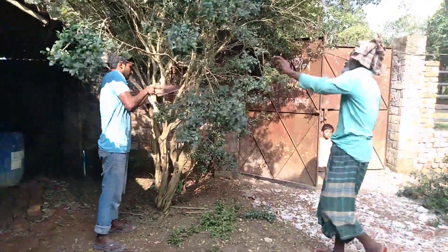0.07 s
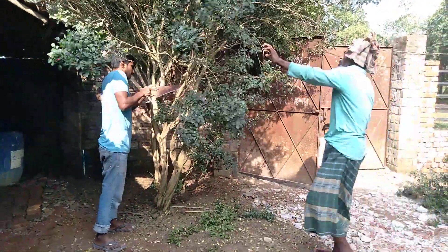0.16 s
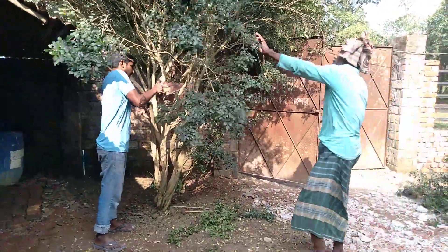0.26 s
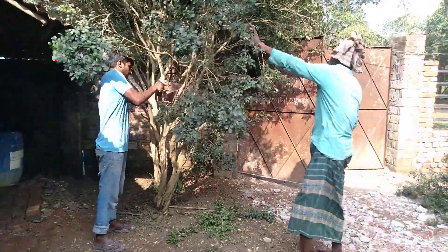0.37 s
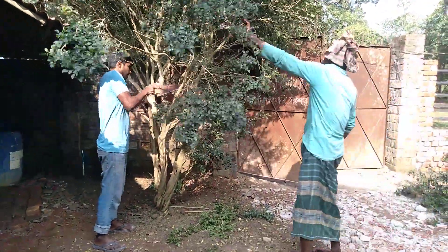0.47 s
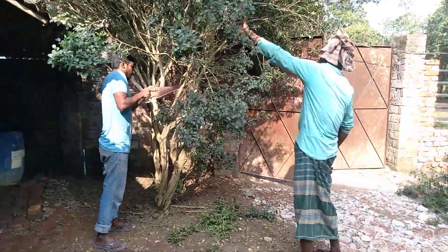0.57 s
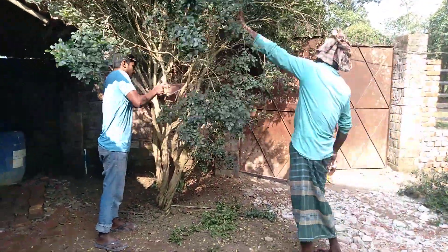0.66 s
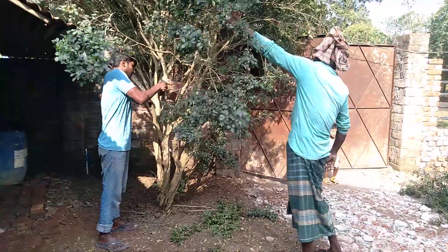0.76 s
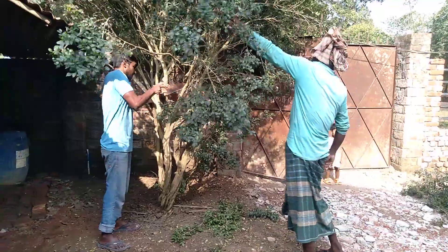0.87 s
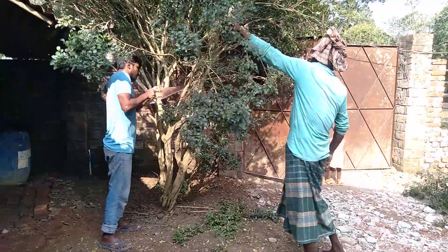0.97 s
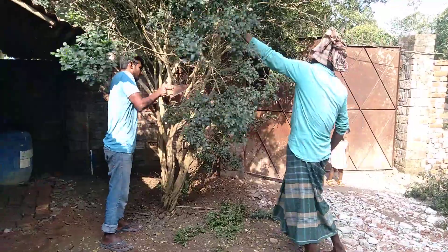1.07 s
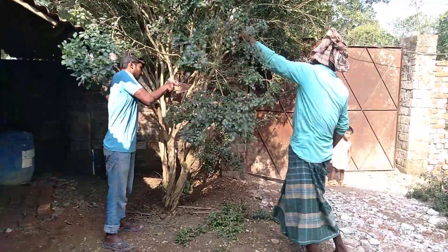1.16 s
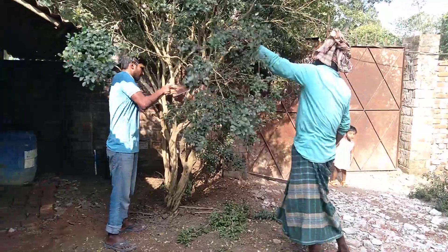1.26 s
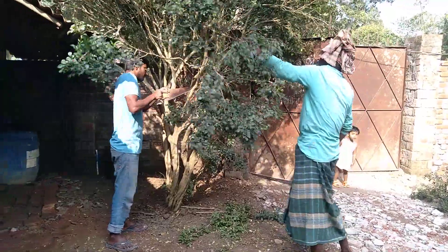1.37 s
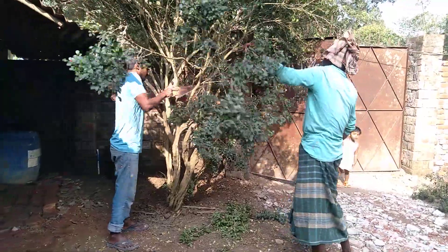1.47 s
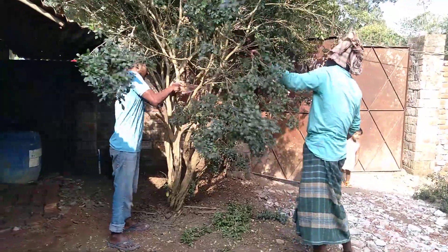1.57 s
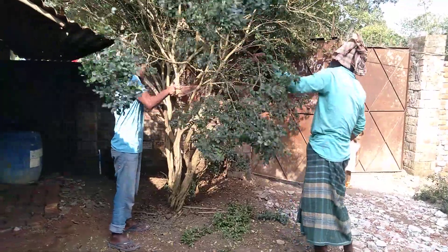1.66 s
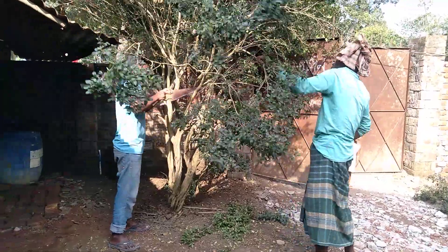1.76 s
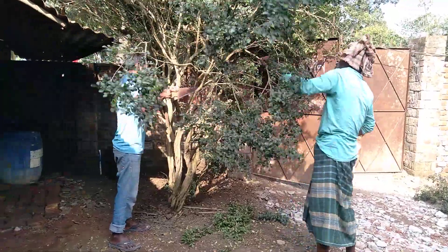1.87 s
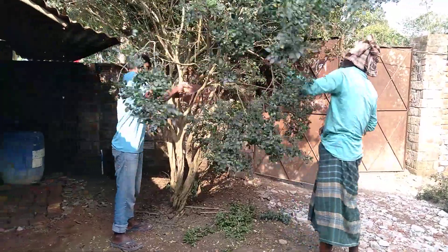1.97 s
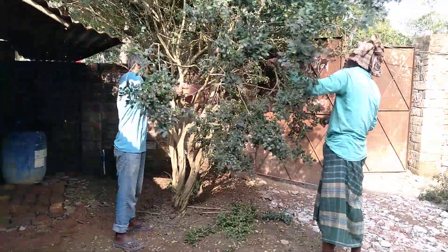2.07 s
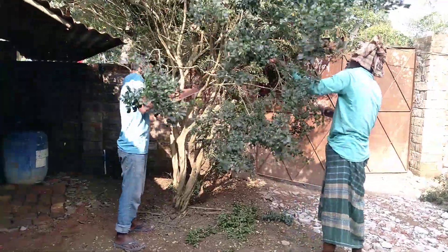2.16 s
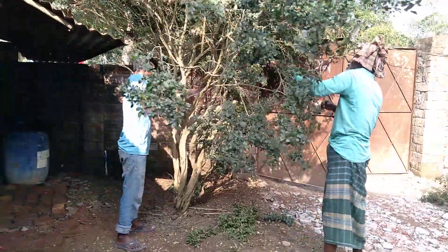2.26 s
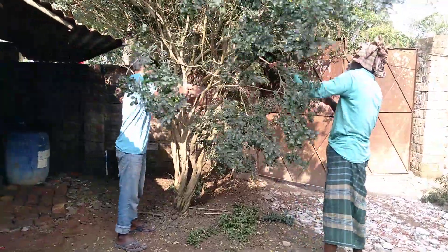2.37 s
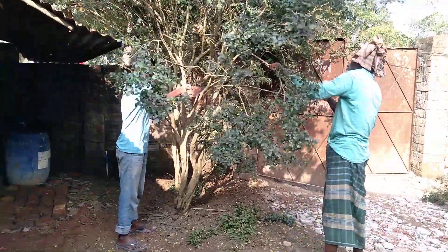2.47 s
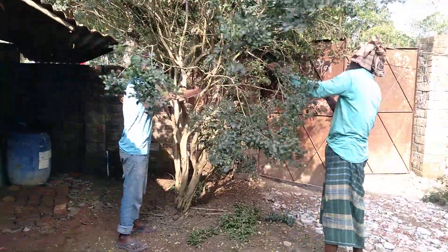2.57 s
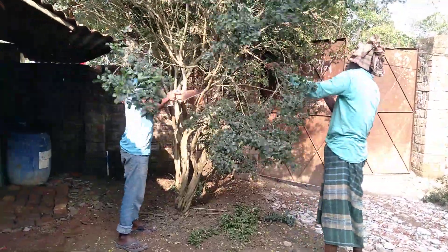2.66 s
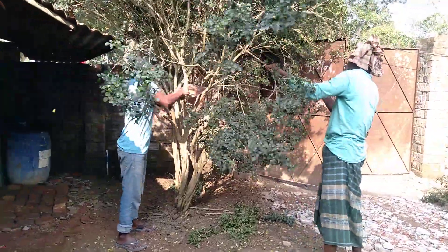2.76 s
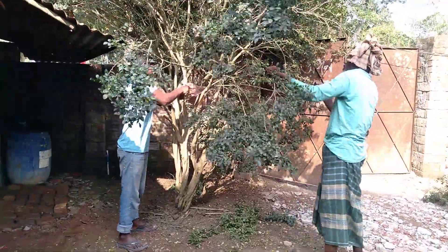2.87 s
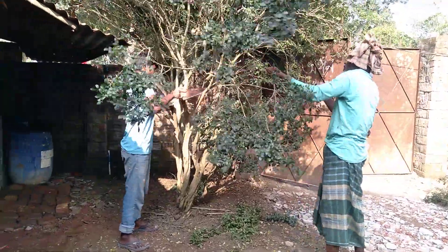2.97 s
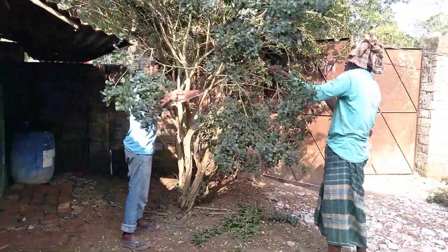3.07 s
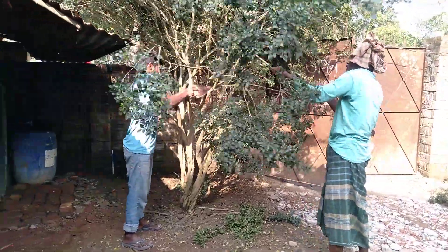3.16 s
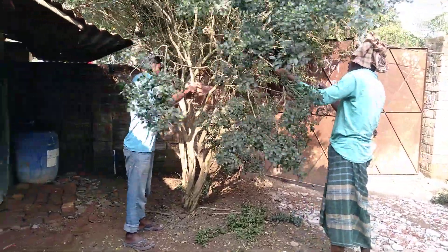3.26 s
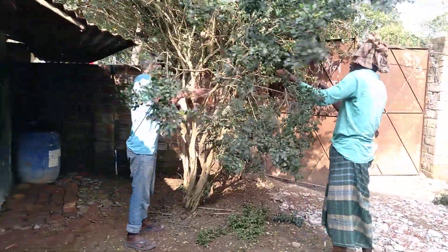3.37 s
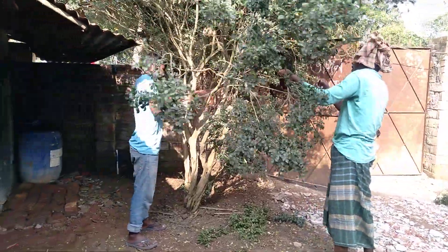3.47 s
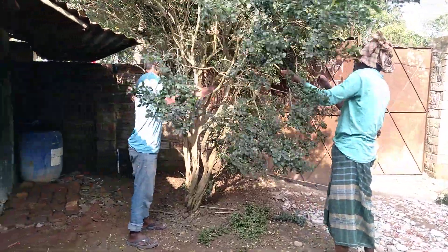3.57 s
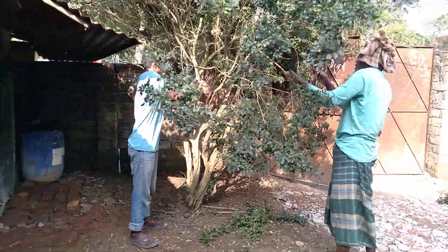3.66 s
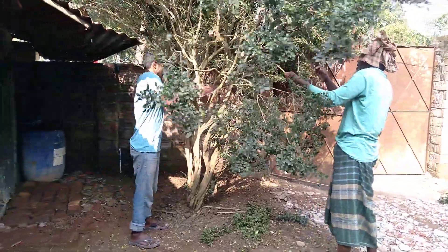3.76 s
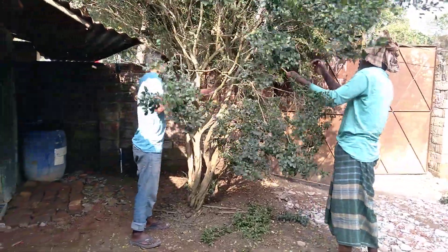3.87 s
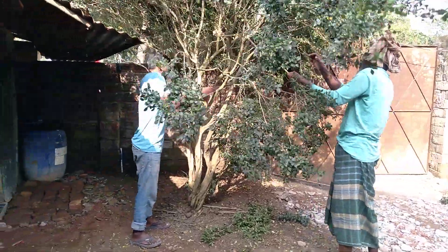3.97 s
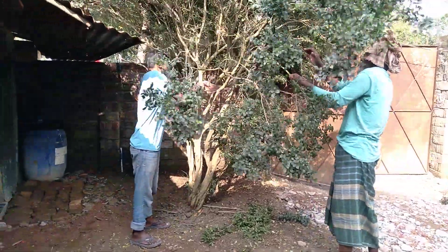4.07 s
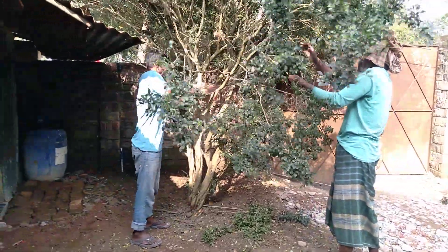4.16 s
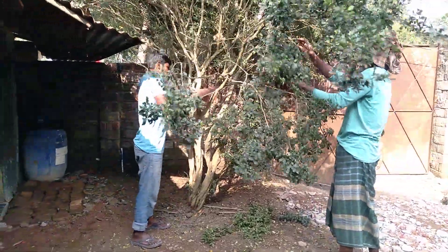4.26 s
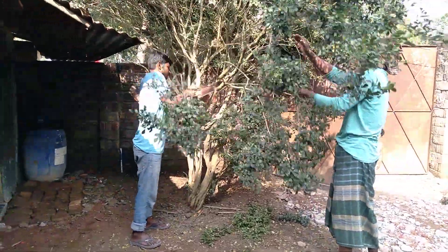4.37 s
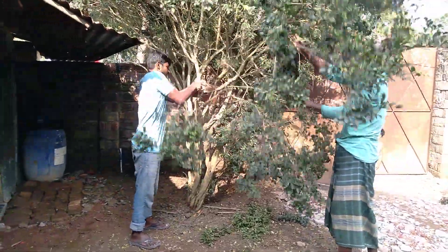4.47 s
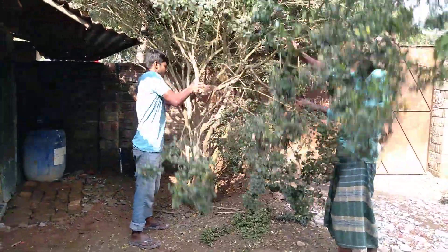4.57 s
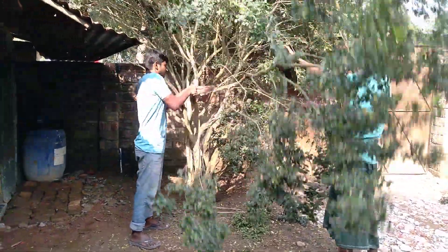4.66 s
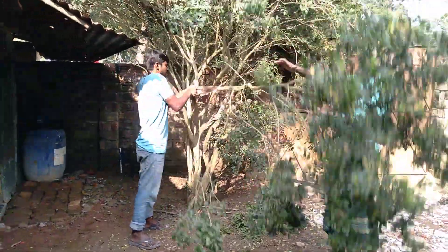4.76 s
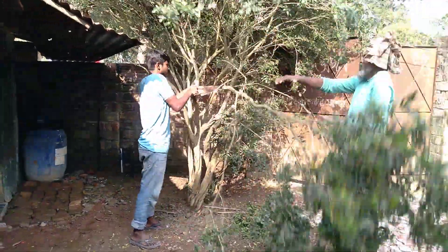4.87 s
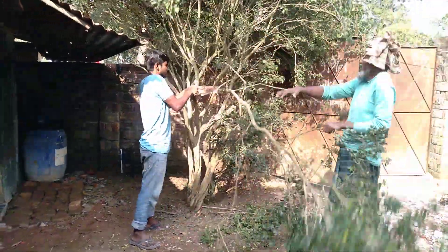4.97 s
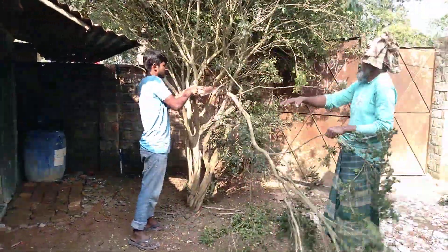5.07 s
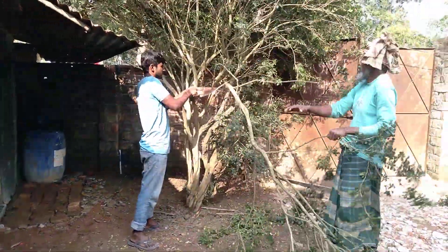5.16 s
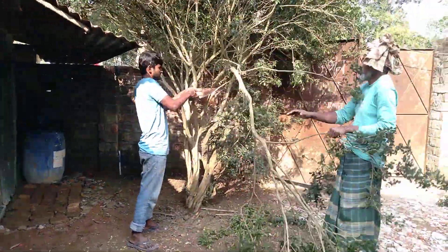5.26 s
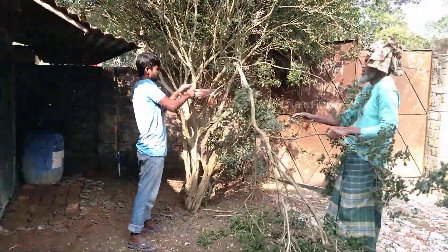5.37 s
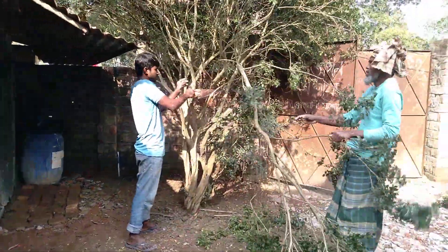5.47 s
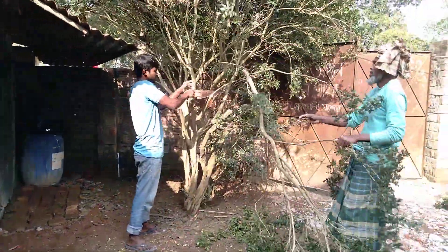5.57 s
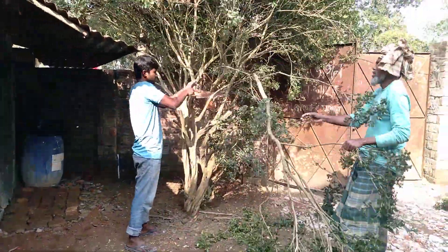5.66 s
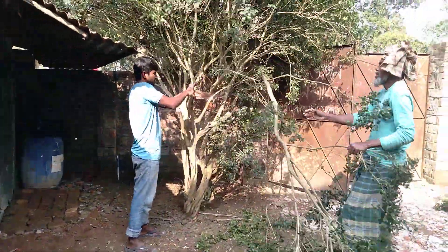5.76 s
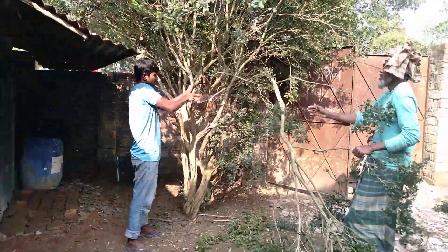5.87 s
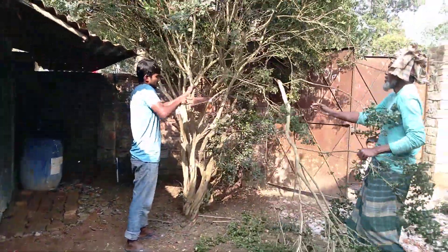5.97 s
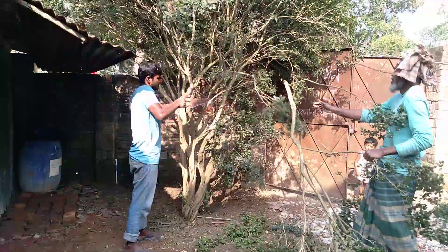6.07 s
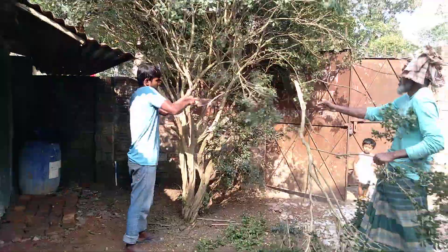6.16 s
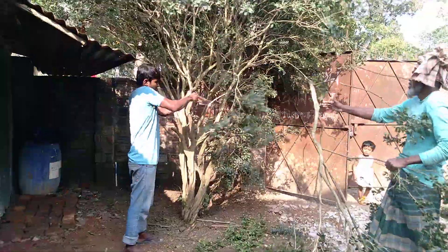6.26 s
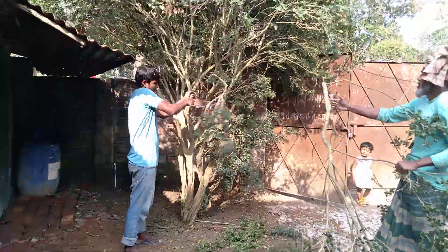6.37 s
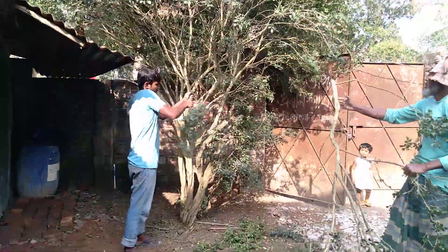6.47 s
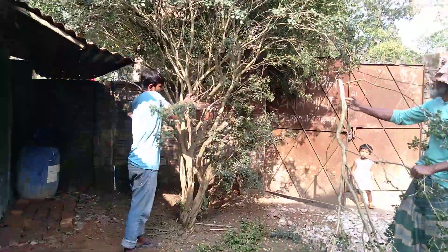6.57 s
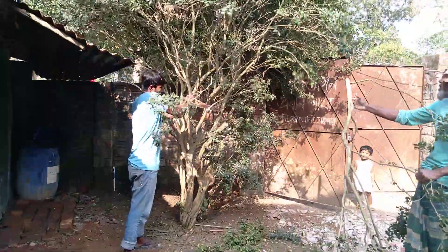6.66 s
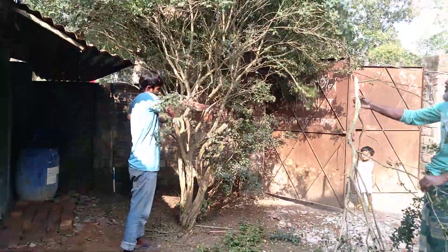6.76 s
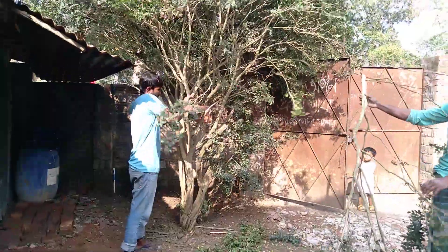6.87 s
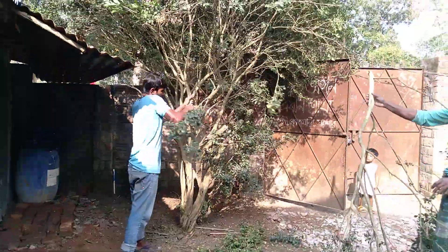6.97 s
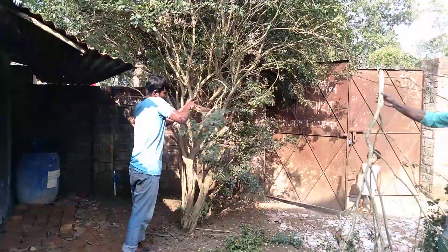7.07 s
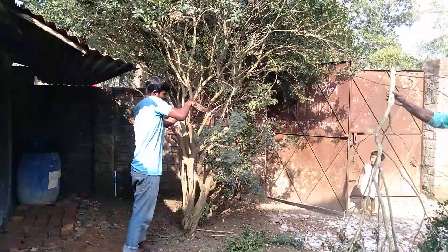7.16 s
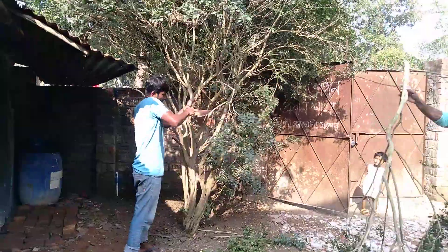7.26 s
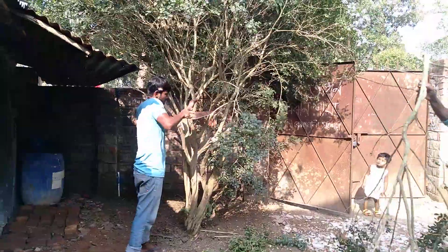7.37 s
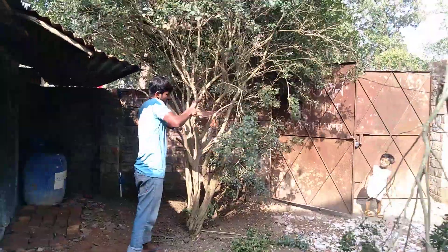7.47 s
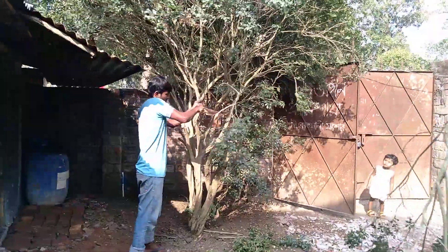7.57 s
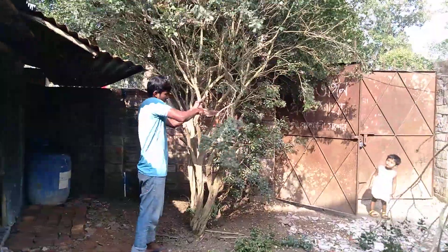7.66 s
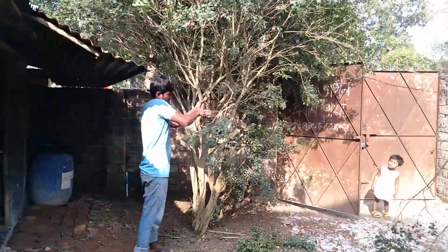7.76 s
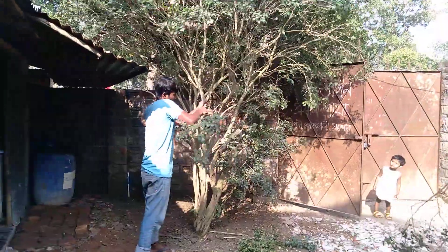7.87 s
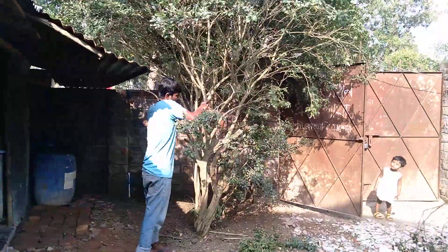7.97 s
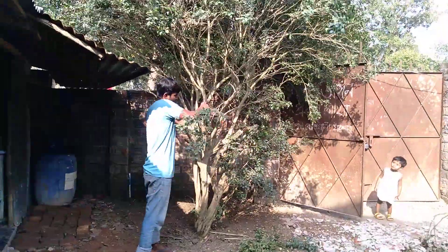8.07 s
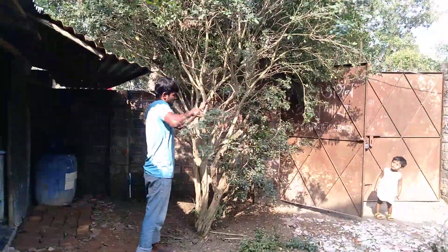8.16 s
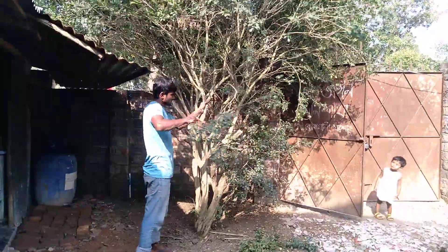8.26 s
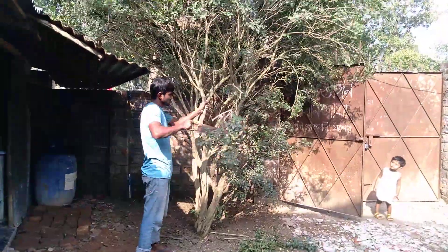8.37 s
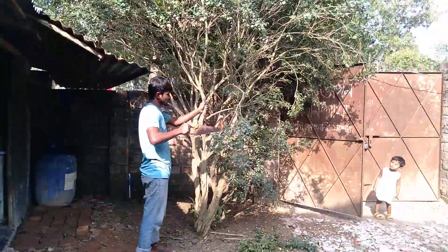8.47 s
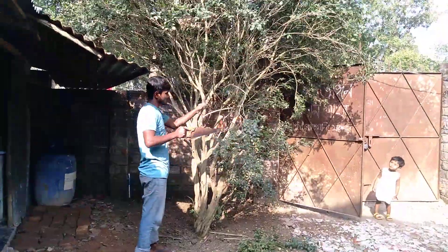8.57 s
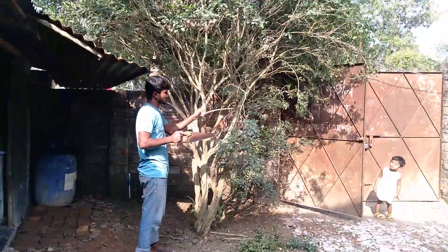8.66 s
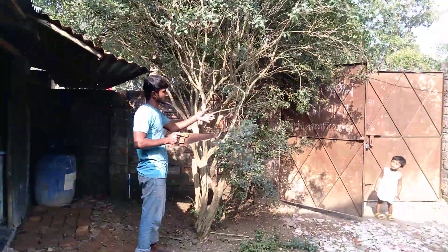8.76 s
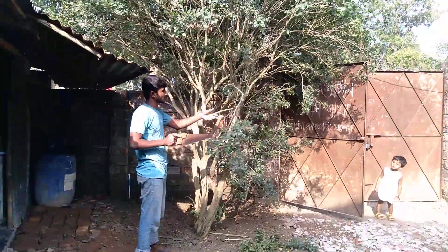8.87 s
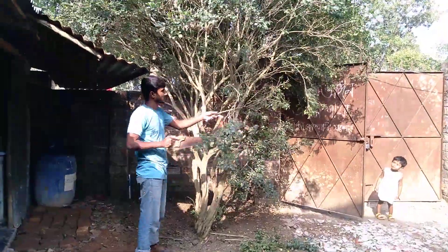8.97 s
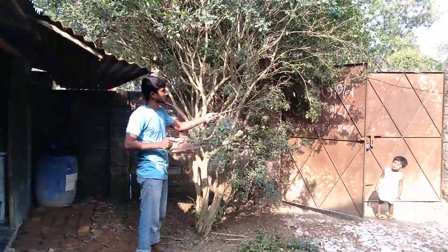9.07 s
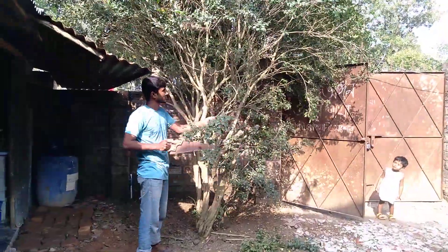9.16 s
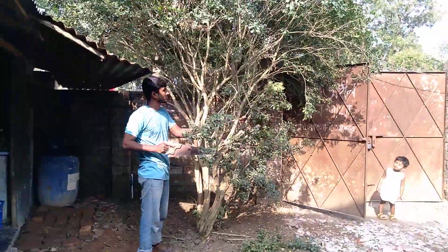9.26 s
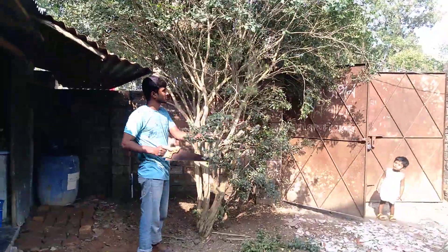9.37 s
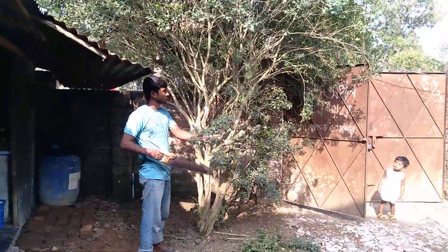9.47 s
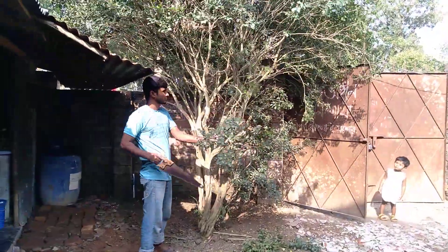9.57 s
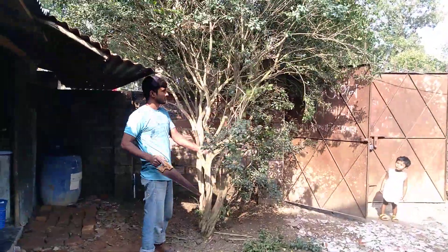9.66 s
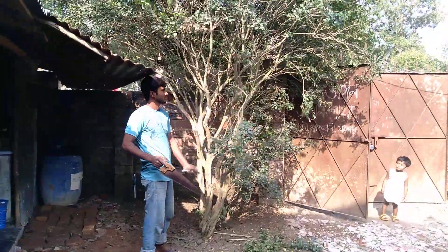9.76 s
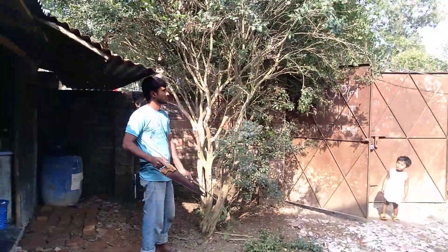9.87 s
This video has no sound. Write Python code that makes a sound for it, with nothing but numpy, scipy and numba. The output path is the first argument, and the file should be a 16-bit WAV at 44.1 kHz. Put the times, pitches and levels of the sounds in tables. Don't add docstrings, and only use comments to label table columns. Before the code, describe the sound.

Steady hand sawing in green wood with ticking leaves, a sharp splintering crack and leafy fall, then sparse catching strokes and knocks in a yard.

```python
import sys
import numpy as np
from scipy import signal
from scipy.fft import rfft, irfft, next_fast_len
from scipy.io import wavfile
from scipy.ndimage import uniform_filter1d, map_coordinates
from numba import njit

SR = 44100
rng = np.random.default_rng(int(sys.argv[2]) if len(sys.argv) > 2 else 0)


def linear_from_db(decibels):
    return 10 ** (np.asarray(decibels, float) / 20)


def unload_wav(signal):
    wavfile.write(
        sys.argv[1],
        SR,
        np.round(np.clip(np.atleast_2d(signal).T, -1, 1) * 32767).astype(np.int16),
    )


N = 437451


def level(x, db):
    return x * linear_from_db(db) / np.sqrt(np.mean(x ** 2))


@njit
def svf(x, hz, width_hz, bend):
    y, band, low = np.empty(len(x)), 0., 0.
    tuned, damping = np.tan(np.pi * hz / SR), width_hz / hz
    for i in range(len(x)):
        g = tuned * bend[i]
        v = (band + g * (x[i] - low)) / (1 + g * (g + damping))
        band = 2 * v - band
        low += 2 * g * v
        y[i] = damping * v
    return y


def steepen(x, hz, width_hz):
    return level(svf(x, 1. * hz, 1. * width_hz, np.ones(len(x))), 0)


def above(x, hz):
    return signal.sosfilt(signal.butter(4, hz, "high", fs=SR, output="sos"), x)


def colour(x, spectrum):
    hz, db = np.transpose(spectrum)
    size = next_fast_len(len(x))
    log_hz = np.log(np.fft.rfftfreq(size, 1 / SR) + 1)
    gain = linear_from_db(np.interp(log_hz, np.log(hz), db))
    return level(irfft(rfft(x, size) * gain, size)[:len(x)], 0)


def read(rows):
    s, *columns = np.transpose(rows)
    return [np.interp(np.arange(N) / SR, s, c) for c in columns]


def walk(rate):
    place = np.arange(0, N + 64, 64) * rate / SR
    coarse = map_coordinates(rng.standard_normal(int(place[-1]) + 2), [place], order=3)
    return np.interp(np.arange(N), 64 * np.arange(len(place)), coarse)


def grains(share, spread_db, smear_s):
    size_db = spread_db * np.minimum(rng.exponential(size=N), 4)
    starts = (rng.random(N) < share) * linear_from_db(size_db)
    return level(signal.lfilter([1], [1, -np.exp(-1 / (smear_s * SR))], starts), 0)


def body(push, modes, drift=0., patchy_db=0.):
    total = 0
    for hz, width_hz, db in modes:
        gain = linear_from_db(db + patchy_db * walk(rate=9))
        bend = np.exp(drift * walk(rate=6))
        total = total + gain * svf(push * rng.standard_normal(N), 1. * hz, 1. * width_hz, bend)
    return level(total, 0)


def swells(s, db, rise_s, fall_s, round_top, floor_db):
    t = np.arange(0, N + 64, 64) / SR
    s, db, rise_s, fall_s = (np.reshape(c, (-1, 1)) for c in (s, db, rise_s, fall_s))
    away = np.where(t < s, (s - t) / np.abs(rise_s), (t - s) / np.abs(fall_s))
    hump_db = db - 10 * np.minimum(away, 20) ** round_top
    power = np.sum(linear_from_db(2 * hump_db), axis=0)
    return 10 * np.log10(np.interp(np.arange(N) / SR, t, power) + linear_from_db(2 * floor_db))


def rings(rows, swell_s):
    out, age = np.zeros(N + 8192), np.arange(8192) / SR / swell_s
    for s, db, hz in rows:
        tone = np.sin(2 * np.pi * hz * swell_s * age)
        out[int(s * SR):][:len(age)] += linear_from_db(db) * age * np.exp(1 - age) * tone
    return out[:N]


def air():
    # hz, db_per_hz
    air_spectrum = [(15, -55), (30, -31), (72, -20.5), (300, -30), (570, -35), (1300, -36), (2500, -34),
                    (3800, -33), (4500, -11), (8100, 1.5), (11300, -8), (15200, -2.5), (16500, -25)]
    return linear_from_db(-40.0 + 0.28 * walk(rate=4.8)) * colour(rng.standard_normal(N), air_spectrum)


def leaves():
    # time_s, leaf_level_db, bough_weight_db
    shaking = [(0, -40.5, 3.5), (1.2, -41.5, -4.5), (1.9, -39.5, 1.5), (4.25, -43, 4.5), (4.45, -30, 17),
               (4.7, -32.5, 1), (4.95, -36, -3), (5.15, -26.5, 8), (5.45, -31.5, 2.5), (5.75, -40.5, -9.5),
               (6.5, -40.5, -9.5), (7.9, -40, -26), (8.73, -37.5, -36), (8.93, -58.5, -4),
               (9.24, -61.5, -4), (9.36, -42.5, -9.5), (9.7, -34.5, -6), (9.92, -42, 17)]
    # peak_s, level_db, rise_10db_s, fall_10db_s, weight_db
    brushes = [(1.535, -29.5, -0.1147, 0.23, -1), (5.0, -33, 0.3958, 0.28, -2),
               (5.08, -27.5, 0.1941, 0.1973, 6.5), (5.191, -16.5, 0.1138, 0, -2.5),
               (5.8, -43.5, -1, -0.5, -26.5), (5.93, -48.5, 0.16, -1, 2.5), (6.12, -41, -7.18, 0.22, -21),
               (6.21, -33, 0.13, 0.14, 16), (6.45, -41, -0.25, 1.05, -19),
               (7.14, -31.5, -0.06, 0.084, -9.5), (7.32, -33.5, 0.03, 0.3, -10.5),
               (7.57, -31.5, -0.0269, 0.039, 16.5), (7.97, -41.5, -1.28, 0.24, -26),
               (8.179, -28.5, 0.0123, 0.1189, 13.5), (8.32, -40, 0.0154, 0.1238, 11.5),
               (8.765, -43, 0.02, 0.1123, 12.5), (9.38, -34, 0.142, 0.13, -18),
               (9.52, -38.5, 0.09, -0.1, -4.5), (9.18, -47, -0.07, .03, -15),
               (9.24, -54.5, -0.15, 2.74, -7.5), (9.791, -21.5, 0.094, 0.01, -1),
               (9.85, -38.5, 0.094, -3.28, 5)]
    # hz, db_per_hz
    leaf_spectrum = [(2350, -41), (4000, -10.5), (6200, -2.5), (7540, 1.5), (11600, -7), (15200, -4),
                     (16200, -7.5), (16500, -48)]
    twig_spectrum = [(1250, -45.5), (1750, -10.5), (2090, -4.5), (2280, -0.5), (3910, -1), (5000, -9.5),
                     (6500, -26.5), (11000, -120)]
    bough_spectrum = [(110, -35), (200, -12), (480, -12.5), (660, -1), (901, 2.5), (1600, -7), (2080, -24),
                      (3520, -120)]
    stem_spectrum = [(1050, -44.5), (1380, -6), (1550, -3), (1900, -2), (2500, -20)]
    steady_db, weight_db = read(shaking)
    s, db, rise_s, fall_s, pull_db = np.transpose(brushes)

    def shake(share):
        settle_s = fall_s * (1 - 0.364 * share)
        return swells(s, db + share * pull_db, rise_s, settle_s, 0.928, steady_db + share * weight_db)

    leaf_db = shake(0)
    twig_db = -10 + shake(0.1293) - leaf_db
    bough_db = -23.5 + shake(1) - leaf_db
    stem_db = -15 + shake(0.486) - leaf_db
    twig_db = twig_db - 0.362 * np.maximum(leaf_db + 35.5, 0)
    rattle = linear_from_db(-13.5) * grains(0.0039, 5.2, 0.0016)
    leaf = colour(rng.standard_normal(N) * (linear_from_db(1.72 * walk(rate=31)) + rattle), leaf_spectrum)
    twig = colour(rng.standard_normal(N) * (linear_from_db(1.09 * walk(rate=18)) + rattle), twig_spectrum)
    bough = colour(rng.standard_normal(N) * linear_from_db(1.78 * walk(rate=15)), bough_spectrum)
    stem = linear_from_db(stem_db + 2.0 * walk(rate=20)) * colour(rng.standard_normal(N), stem_spectrum)
    return linear_from_db(leaf_db - 1.0) * (leaf + stem + linear_from_db(twig_db) * twig + linear_from_db(bough_db) * bough)


def strokes(lag_s, sharp, stretch, column):
    # time_s, blade_db, wood_rel_db, branch_thud_rel_db
    pushes = [(.33, -33, -3, -12.5), (.735, -32.5, -2.5, -14.5), (1.55, -32.5, -1.5, -12),
              (1.99, -30, -4.5, -8.5), (2.4, -29, -4.5, -17), (2.805, -29.5, -5, -15.5),
              (3.225, -29, -5.5, -10.5), (3.645, -29.5, -5, -13.5), (4.06, -28, -7, -14.5),
              (6.21, -30.5, -1.5, -11.5), (8.178, -35.5, -5, -7.5)]
    # time_s, blade_db, wood_rel_db, branch_thud_rel_db
    pulls = [(.14, -41, -3.5, -19.5), (.55, -41, -0.5, -10.5), (.95, -41, -2.5, -12.5),
             (1.14, -35.5, -5, -19.5), (1.385, -37.5, -4.5, -20.5), (1.8, -40, 0, -24),
             (2.19, -38, -4.5, -12.5), (2.62, -39, -4, -18), (3.03, -39, -3, -10.5), (3.46, -36.5, -4, -15),
             (3.87, -37.5, -6, -13), (4.23, -42, -6, -16), (6.07, -42.5, 0, -11), (7.4, -44, 0.5, -10),
             (7.57, -40, -2.5, -7.5)]
    # time_s, blade_db, wood_rel_db, branch_thud_rel_db
    catches = [
        (5.95, -40, -5.5, -11.5),
        (6.87, -42.5, -31, -20.5),
        (6.95, -47, -3.5, -13.5),
        (7.315, -32, -8, -12),
        (8.15, -32, -10.5, -32),
        (8.32, -38.5, -1.5, -12.5),
        (8.77, -55.5, 0, -7.5),
    ]
    # rise_10db_s, fall_10db_s, roundness of the top, share of the lag
    push_shape, pull_shape = (.045, .042, 1.4, 0.89), (0.1096, 0.094, 3, 0.1054)
    catch_shape = (.006, .055, 1.2, 0.303)
    db = -95
    for rows, shape in ((pushes, push_shape), (pulls, pull_shape), (catches, catch_shape)):
        rise_s, fall_s, round_top, late = shape
        c = np.transpose(rows)
        peak_db = c[1] + (c[column] if column else 0)
        db = swells(c[0] + late * lag_s, peak_db, rise_s * sharp, fall_s * stretch, round_top, db)
    return db


def saw():
    # hz, width_hz, level_db
    branch_modes = [(127.2, 27, -9.5), (215, 41.4, 2), (308.5, 125, -1.5)]
    # hz, width_hz, level_db
    wood_modes = [(626.9, 69.7, 2), (724.8, 99, 3.5), (923, 96, -3.5), (1061, 49.2, 3), (1327, 214, 1),
                  (1670, 234, -3.5)]
    # hz, width_hz, level_db
    blade_modes = [(1951, 258, -3.5), (2451, 292, 3), (3150, 252, 0.5), (4050, 753, 0), (4606, 620, -17)]
    # hz, width_hz, level_db
    kerf_modes = [(5805, 1170, 1), (7510, 2700, 0), (11900, 6600, -16.5), (15210, 5100, -2.5)]
    blade_db = strokes(0, 0.99, 1, column=0)
    wood_db = strokes(0.00783, 0.898, 1.284, column=2) - blade_db
    thud_db = strokes(0.0248, 0.558, 1.252, column=3) - blade_db
    teeth_hz = 260.3 * np.exp(.03 * (blade_db + 40.5) + 0.17 * walk(rate=90))
    tooth = np.cumsum(teeth_hz / SR)
    bite = linear_from_db(1.5 * rng.standard_normal(N // 20))[tooth.astype(int)]
    tear = bite * (.9 + np.exp(-(tooth % 1) / .3))
    tear = level(tear, 0) + linear_from_db(-16) * grains(0.0077, 3.3, 0.0011)
    chatter = linear_from_db(1.76 * walk(rate=40))
    blade = above(body(tear, blade_modes, drift=.07, patchy_db=2), 1100)
    wood = steepen(body(tear, wood_modes, drift=0.037, patchy_db=3.0), 958, 1400)
    wood = linear_from_db(wood_db - 0.5) * above(wood, 442)
    thud = body(tear, branch_modes, drift=0.099, patchy_db=3.0)
    thud = steepen(steepen(thud, 200, 350), 200, 350)
    thud = linear_from_db(thud_db + 2.28 * walk(rate=26)) * thud
    chips = linear_from_db(1.5 + 0.036 * (blade_db + 34.0)) * body(tear, kerf_modes)
    return linear_from_db(blade_db - 0.5) * chatter * (blade + wood + thud + chips)


def snaps():
    # start_s, tick_peak_db, centre_hz, splinter_tail_rel_db
    fibres = [(0.2982, -27.5, 6200, -9.5), (0.7127, -23.5, 8700, -13.5), (1.089, -18, 7860, -13.5),
              (1.503, -13, 7260, -10.5), (1.5269, -3, 6780, -15), (1.6608, -14.5, 6770, -17),
              (2.7482, -20.5, 6430, -16), (4.2265, -20.5, 8380, -12.5), (4.2415, -21, 5990, -8),
              (4.28, -7, 7230, -12), (4.374, -5.5, 7400, -9.5), (4.4083, 3, 6850, -18.5),
              (5.0722, -11.5, 8450, -11), (5.1572, -15.5, 7650, -20), (5.1886, -4.5, 8700, -9.5),
              (5.798, -23.5, 7910, -8.5), (5.894, -17, 8290, -19.5), (5.9422, -22.5, 8820, -9),
              (6.943, -27, 7900, -7.5), (7.1300, -18.5, 8430, -22.5), (7.311, -17, 7530, -11.5),
              (7.858, -26, 8070, -18), (7.7099, -7.5, 8520, -22.5), (8.1460, -27, 8100, -14),
              (8.3071, -14.5, 4960, -11), (8.722, -16, 8940, -29.5), (8.8314, -15, 8300, -24),
              (8.973, -24, 8120, -23.5), (9.1795, -24.5, 7650, -14), (9.5734, -17.5, 7720, -19)]
    out, t = np.zeros(N + 4096), np.arange(4096) / SR
    for (s, db, hz, tail_db), noise in zip(fibres, rng.standard_normal((len(fibres), len(t)))):
        tick = np.sin(2 * np.pi * hz * t) * np.exp(-t * hz / 1.8) * np.minimum(t * hz, 1.3)
        tail = steepen(noise, hz, hz) + 0.22 * steepen(noise, 3150, 2500)
        t60_s = 0.0439 * linear_from_db(0.22 * (db + 9))
        tail = level(tail, tail_db) * np.exp(-np.log(1000) * t / t60_s)
        out[int(s * SR):][:len(t)] += linear_from_db(db + 3.5) * (tick + tail)
    return signal.sosfilt(signal.butter(3, 1800, "high", fs=SR, output="sos"), out[:N])


def short_notes():
    # start_s, peak_db, pitch_hz
    note_rows = [(4.43, -32.5, 1007), (4.43, -33.5, 658.6), (4.89, -56, 430), (5.52, -60.5, 457),
                 (5.9, -51.5, 850), (5.97, -45, 227.2), (6.06, -42.5, 766), (6.07, -52, 229),
                 (6.18, -30.5, 683.6), (6.21, -46.5, 230), (6.73, -63.5, 169.4), (6.82, -67.5, 795),
                 (6.87, -56, 229.4), (6.96, -53, 710.4), (6.97, -54, 1350), (7.12, -59.5, 708),
                 (7.33, -42.5, 199), (7.39, -37.5, 914), (7.52, -40, 689), (7.57, -43, 1378),
                 (7.57, -42, 345), (8.06, -58.5, 1232), (8.1, -67, 1037), (8.19, -36, 685.7),
                 (8.19, -35.5, 914), (8.19, -34, 227.3), (8.31, -46.5, 1265), (8.31, -41, 748),
                 (8.33, -45, 286.7), (8.62, -63.5, 691), (0.52, -43, 642), (0.33, -44, 1033),
                 (1.83, -44, 682), (2.4, -43.5, 745), (3.24, -41.5, 705), (8.77, -54, 812.5),
                 (8.78, -51.5, 976), (9.06, -60, 1183), (9.07, -64, 970), (9.11, -62.5, 944),
                 (9.26, -67, 1404), (9.4, -57.5, 1310), (9.51, -60, 831), (9.52, -63, 627),
                 (9.64, -52, 918), (9.64, -53.5, 1266)]
    return rings(note_rows, swell_s=0.00943)


def ground():
    # peak_s, level_db, fall_10db_s
    steps = [(.41, -63, 0.47), (1.62, -66, 0.18), (2.03, -69, 0.7), (2.85, -58, 0), (3.28, -64.5, -0.3),
             (4.11, -60.5, 0.12), (4.43, -50, 0.1759), (5.19, -64, 0.24), (6.07, -66, 0.5),
             (6.27, -65, 0.02), (7.45, -66, 0.46), (7.68, -50, -0.0553), (8.25, -75, 0.5), (9.5, -63.5, 0)]
    s, db, fall_s = np.transpose(steps)
    thud_db = swells(s, db, .06, fall_s, 1.08, floor_db=-76.5)
    soil = above(steepen(body(1, [(78.2, 104, 0)]), 72.3, 80), 48)
    return linear_from_db(thud_db + 1.2 * walk(rate=17)) * soil


def ticks():
    # centre_s, peak_db
    clicks = [(1.0262, -18), (1.0828, -23), (1.0933, -15.5), (1.0971, -21), (1.1189, -21.5), (1.2381, -27),
              (1.3471, -26), (1.512, -10.5), (1.5314, -12), (1.5363, -17), (1.5392, -8.5), (1.7488, -21),
              (1.7702, -26.5), (2.3971, -20.5), (3.2239, -22.5), (3.4774, -19.5), (3.9107, -22),
              (3.9269, -16.5), (4.0619, -22.5), (4.3329, -15), (4.7263, -17), (4.7527, -14), (4.7577, -16),
              (4.7654, -14.5), (4.821, -19.5), (4.9957, -12), (5.0039, -11.5), (5.0133, -8), (5.0288, -13),
              (5.0436, -17), (5.0757, -12.5), (5.0885, -10.5), (5.0899, -9), (5.176, -6), (5.1805, -5),
              (5.1906, 5.5), (5.1922, -3.5), (5.1975, -6), (5.2254, -3), (5.2532, -18.5), (5.2911, -21.5),
              (5.4594, -13), (5.5817, -25.5), (5.7921, -22), (5.8805, -25), (6.1328, -12), (6.2453, -17),
              (7.1378, -12.5), (7.1441, -21.5), (7.3159, -18), (7.6036, -15), (7.6637, -16), (8.1533, -10),
              (8.1968, -17), (8.3104, -17), (8.7234, -14), (8.7407, -24), (8.9863, -25), (9.3061, -25),
              (9.346, -22.5)]
    out, t = np.zeros(N + 64), np.arange(-32, 32) / SR
    for (s, db), off in zip(clicks, rng.standard_normal(len(clicks))):
        hz = 8564 * np.exp(.2 * off)
        click = np.exp(-(t / .00008) ** 2 / 2) * np.sin(2 * np.pi * hz * t + 1)
        out[int(s * SR) - 32:][:64] += linear_from_db(db) * click
    return out[:N]


def blade_pips():
    # start_s, peak_db, pitch_hz
    touches = [
        (1.396, -31, 2542),
        (6.863, -39.5, 2510),
        (6.865, -40, 4050),
        (6.935, -35, 4440),
        (6.943, -41.5, 3610),
    ]
    return rings(touches, swell_s=0.0028)


def far_knocks():
    # start_s, length_s, pitch_hz, level_db
    knock_rows = [(2.228, 0.27, 348.9, -41.5), (2.562, 0.1325, 351.6, -44.5), (2.848, 0.13, 347.4, -48.5),
                  (3.133, 0.098, 344.8, -47), (3.405, 0.074, 325.6, -50), (3.697, 0.072, 4570, -49),
                  (4.864, 0.094, 389.5, -61), (5.334, 0.254, 430.6, -63), (5.624, 0.104, 420, -66.5),
                  (6.407, 0.035, 398.5, -64.5), (6.627, 0.037, 1035, -66), (7.138, 0.116, 1025, -59.5),
                  (7.805, 0.042, 694, -66), (8.307, 0.128, 710, -52.5), (8.444, 0.115, 673, -64),
                  (8.522, 0.113, 667, -70), (8.772, 0.081, 323.7, -50.5), (9.089, 0.1505, 342, -47),
                  (9.142, 0.078, 685, -60), (9.408, 0.15, 346.2, -45), (9.698, 0.15, 332.5, -52)]
    t, out = np.arange(N) / SR, 0
    waver, wobble = linear_from_db(3.5 * walk(rate=35)), .55 * walk(rate=45)
    for s, length_s, hz, db in knock_rows:
        age = np.clip(t - s, 0, 1)
        sag = 0.117 * age ** 2 / 2
        sharp_start = 0.00212 * np.exp(-age / 0.0256)
        phase = 2 * np.pi * hz * (age - sag - sharp_start) + wobble * min(hz / 330, 1.4)
        rise = np.sin(np.pi / 2 * np.minimum(age / .022, 1)) ** 2
        fade = np.exp(-age / .14 - np.maximum(age - length_s, 0) / .03) * (age < 1)
        out = out + linear_from_db(db + 5.0) * rise * fade * np.sin(phase)
    breath = 1 + linear_from_db(-9.5) * walk(rate=160)
    return out * waver * breath


def limb():
    # start_s, peak_db, tear_length_s, low_share_db, fade_9db_s
    bursts = [(4.2721, -12.5, 0.0038, -15, 0.0051), (4.2793, 0.5, 0.0045, -19, -0.0003),
              (4.2919, -4, 0.00123, -22, 0.0004), (4.297, -12.5, .007, -20.5, 0.024),
              (4.309, -25, 0.026, -21, 0.12), (4.367, -8, 0.00354, -17, -0.0061),
              (4.371, -2.5, 0.0038, -17.5, -0.0106), (4.3842, -12.5, .001, -21.5, -0.0042),
              (4.389, -19, .006, -26, 0.05), (4.4078, 4.5, 0.00514, -9.5, 0.0013),
              (4.4185, 4, 0.0046, -12, -0.005), (4.428, 1.5, .003, -14, 0.0048),
              (4.443, -10.5, .01, -16, 0.0274), (4.468, -11, .004, -6.5, 0.0226),
              (4.512, -15, .002, -14.5, 0.049)]
    # hz, db_per_hz
    splinter_spectrum = [(59, -51.5), (100, -25), (331, -12), (427, -39.5), (615, -12), (699, -30),
                         (1950, -4.5), (2680, 3.5), (4680, 2), (7480, 5), (9470, -3.5), (15500, -10.5),
                         (16500, -28.5)]
    t, push, low = np.arange(N) / SR, 0, 0
    for s, db, length_s, low_db, fade_s in bursts:
        age = np.maximum(t - s, 0)
        after = np.maximum(age - length_s, 0)
        push = push + linear_from_db(db) * np.minimum(age / 0.00065, 1) * np.exp(-after / abs(fade_s))
        low = low + linear_from_db(db + low_db) * np.minimum(age / 0.0092, 1) * np.exp(-after / 0.01634)
    cracks = 0.74 + 0.307 * grains(0.0035, 1.5, 0.0027)
    splinters = colour(rng.standard_normal(N) * cracks, splinter_spectrum)
    wood = body(1, [(650, 250, -9), (1160, 1030, 0.0), (2457, 414, 7)])
    return linear_from_db(-10.5) * (push * splinters + low * wood)


@njit
def walls(x, lags, gain, damp):
    line, soft, out = np.zeros((8, 4096)), np.zeros(8), np.zeros(len(x))
    for i in range(len(x)):
        total = 0.
        for k in range(8):
            soft[k] += (1 - damp) * (gain[k] * line[k, (i - lags[k]) & 4095] - soft[k])
            total += soft[k]
            out[i] += soft[k] * (1 - 2 * (k % 2))
        for k in range(8):
            line[k, i & 4095] = x[i] + soft[k] - total / 4
    return out


def scene():
    shrub = leaves() + snaps() + short_notes() + ticks() + limb()
    near = shrub + saw() + blade_pips() + ground() + far_knocks()
    lags, t60_s = rng.integers(600, 2600, 8), 0.4064
    echo = walls(near + 1e-18, lags, linear_from_db(-60 * lags / SR / t60_s), 0.264)
    mono = near + linear_from_db(-17) * echo
    return np.array([mono, mono])


def hush(x):
    threshold_db, far_rel_db, top_hz = 15, -7, 3880
    hz, _, bins = signal.stft(x, SR, nperseg=1024)
    far = signal.stft(air(), SR, nperseg=1024)[2] * ((hz > 380) & (hz < top_hz))[:, None]
    threshold = linear_from_db(2 * threshold_db) * np.mean(np.abs(far) ** 2, axis=1, keepdims=True)
    bins = bins + linear_from_db(threshold_db + far_rel_db) * far
    power = uniform_filter1d(np.abs(bins) ** 2, size=3, axis=1)
    power = uniform_filter1d(power, size=3, axis=0) + 1e-18
    gain = np.sqrt(np.maximum(1 - (threshold / power) ** 2, 0))
    gain = uniform_filter1d(gain, size=2, axis=1)
    return signal.istft(bins * gain, SR, nperseg=1024)[1][:N]


def roll_off(x):
    return signal.sosfilt(signal.butter(12, 16990, fs=SR, output="sos"), x)


def record(dry):
    mono = .66 * np.tanh((hush(dry[0]) + air()) / .66)
    mono = signal.sosfilt(signal.ellip(10, .2, 70, 15850, fs=SR, output="sos"), mono)
    return roll_off(np.array([mono, mono]))


dry = scene()
out = record(dry)
unload_wav(out)
```